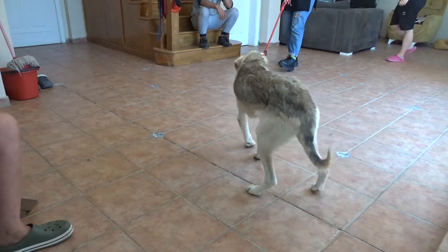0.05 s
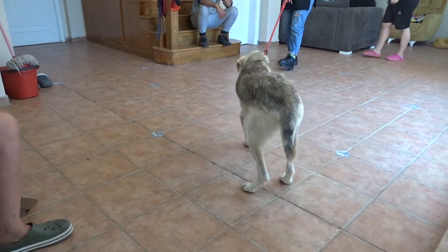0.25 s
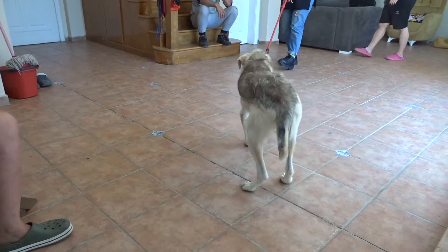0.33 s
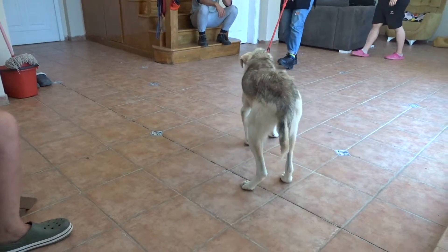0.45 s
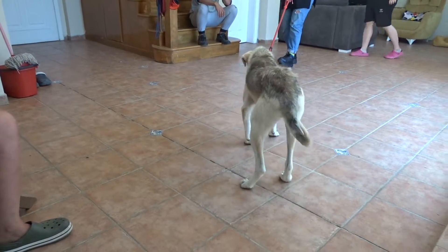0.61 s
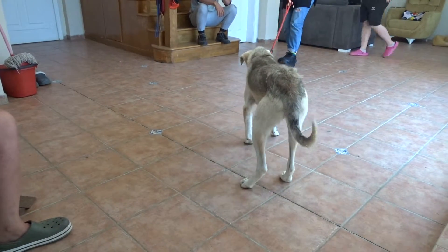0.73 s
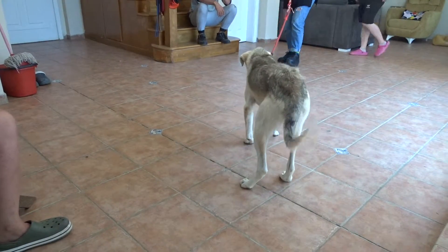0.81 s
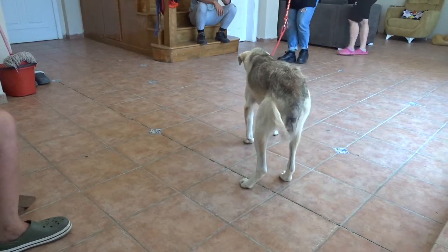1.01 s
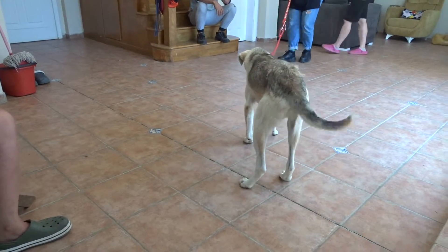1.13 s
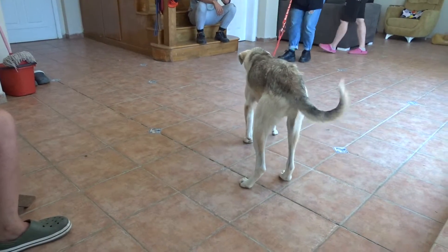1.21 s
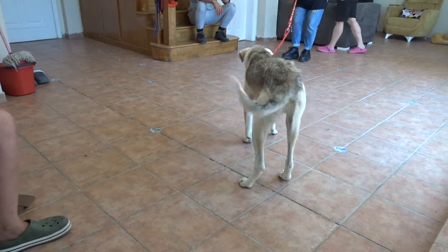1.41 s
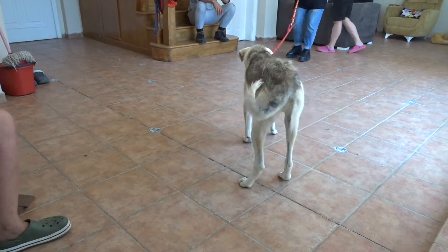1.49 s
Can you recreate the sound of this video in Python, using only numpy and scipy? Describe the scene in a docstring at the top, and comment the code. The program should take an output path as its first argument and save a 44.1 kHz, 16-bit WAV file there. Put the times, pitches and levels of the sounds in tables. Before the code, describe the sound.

A dog whines once, a hoarse note joined by a thin, very high whistle that throbs and drops away. Paws and shoes scuff the tiles, then shifting feet rumble softly in the hard, echoing room.

```python
"""A hard, tiled room, heard through a closely spaced pair of microphones. A dog whines: its vocal folds
give a hoarse low note that swells and fades, with a soft whimper under it. Air hissing through its nose
drives a thin, very high whistle that slides up, holds and drops away, throbbing as it splits into two
strands and ringing off the tiles. Paws and shoes scuff the floor, and shifting feet rumble at the end."""
import sys
import numpy as np
from scipy import signal
from scipy.fft import rfft, irfft
from scipy.io import wavfile

SR = 44100
rng = np.random.default_rng(int(sys.argv[2]) if len(sys.argv) > 2 else 0)


def master(y):
    """Save y as 16-bit WAV."""
    cut = np.clip(np.atleast_2d(y).T, -1, 1)
    pcm = np.round(cut * 32767)  # scale
    wavfile.write(sys.argv[1], SR, pcm.astype(np.int16))


N = 68355
T = np.arange(N) / SR
HZ = np.fft.rfftfreq(N, 1 / SR)
BAND_LIMIT_HZ = 11150


def amp(db):
    """Decibels to gain."""
    return 10 ** (np.asarray(db) / 20)


def unit(x):
    """Scales to an rms of one."""
    return x / np.sqrt(np.mean(x ** 2) + 1e-20)


def read(points, hz):
    """Reads a spectrum on a log-frequency axis."""
    f, value = np.transpose(points)
    return np.interp(np.log(hz + 1), np.log(f + 1), value)


def curve(rows):
    """Every value column of a time table, sample by sample."""
    time_s, *columns = np.transpose(rows)
    return [np.interp(T, time_s, column) for column in columns]


def gate(rows):
    """Open from the first row to the last, with 4 ms edges."""
    return np.clip(np.minimum(T - rows[0][0], rows[-1][0] - T) / .004, 0, 1)


def wander(rate_hz):
    """Random drift, mostly slower than the given rate."""
    return unit(irfft(rfft(rng.standard_normal(N)) / (1 + (HZ / rate_hz) ** 4), N))


def mic_pair(spectra):
    """Makes two unrelated spectra as alike as two closely spaced microphones hear them."""
    # likeness of left and right: frequency_hz, correlation
    likeness = [(100, 1), (700, 0.93), (1400, 0.92), (3000, 0.7), (5000, 0.86), (8000, 0.85), (11000, 0.39)]
    same = np.clip(read(likeness, HZ), -1, 1)
    return np.array([spectra[0], same * spectra[0] + np.sqrt(1 - same ** 2) * spectra[1]])


def noise(colour, resonances=()):
    """Diffuse two-channel noise of a given colour, with narrow resonances."""
    peaks_db = sum(boost / (1 + (2 * (HZ - hz) / width) ** 2) for hz, width, boost in resonances)
    white = mic_pair(rfft(rng.standard_normal((2, N))))
    return unit(irfft(white * amp(read(colour, HZ) + peaks_db), N))


def room(x, wet_db, gap_s=.004, early_db=3, early_s=0.018):
    """Direct sound plus dense reflections from tiles and walls, strongest at first."""
    # time the room takes to die away by 60 dB: frequency_hz, decay_s
    reverb_time = [(150, 0.33), (700, 0.91), (1400, 0.82), (5000, 0.6), (8000, 0.73), (11000, 0.22)]
    echoes = rng.standard_normal((2, N)) * (rng.random(N) < 3000 / SR)  # about 3000 a second
    hz, t, bands = signal.stft(irfft(mic_pair(rfft(echoes)), N), SR, nperseg=256)
    decay = amp(-60 * t / read(reverb_time, hz)[:, None])
    tail = signal.istft(bands * decay, SR, nperseg=256)[1][:, :N]
    tail = tail * (T > gap_s) * amp(early_db * np.exp(-T / early_s))
    tail /= np.sqrt(np.mean(abs(rfft(tail)[:, HZ < BAND_LIMIT_HZ]) ** 2))
    wet = signal.fftconvolve(x[None], tail, axes=1)[:, :N]
    return (x + amp(wet_db) * wet) / np.sqrt(1 + amp(wet_db) ** 2)


def room_tone(hum_hz=291.8):
    """The still room, microphone hiss and a faint wavering hum."""
    # colour of the still room: frequency_hz, gain_db
    room_colour = [(20, -15), (45, -21), (70, -13), (150, -5), (290, 2), (400, -2), (750, -8.5),
                   (1100, -17.5), (2500, -14.5), (5000, -12), (8000, -8), (11000, -15)]
    # colour of each microphone's own hiss: frequency_hz, gain_db
    hiss_colour = [(20, -19), (70, -11), (160, -3), (300, -0.5), (700, 0), (1400, 0.5), (3000, -10.5),
                   (5000, -15), (10000, -26)]
    hum = np.sin(2 * np.pi * hum_hz * T + 0.63 * wander(4.9)) * amp(-65.5 + 2.25 * wander(13))
    hiss = unit(irfft(rfft(rng.standard_normal((2, N))) * amp(read(hiss_colour, HZ)), N))
    return amp(-55) * noise(room_colour) + amp(-58) * hiss + np.sqrt(2) * hum


def feet():
    """Feet shift across the floor: a low boom with a soft shuffle on top."""
    # the feet's movement: time_s, rumble_db, shuffle_db
    movement = [(.95, -94, -65), (1.04, -66, -54.5), (1.10, -63, -59.5), (1.17, -68, -47),
                (1.25, -52.5, -54.5), (1.34, -50.5, -56.5), (1.42, -60, -63), (1.55, -64, -57)]
    # colour of the boom: frequency_hz, gain_db
    rumble_colour = [(50, -42.5), (100, -17), (125, 2.5), (145, 12.5), (180, -12), (250, -17), (295, 2.5),
                     (350, -13), (900, -43)]
    # colour of the shuffle: frequency_hz, gain_db
    shuffle_colour = [(60, -11), (200, -2), (400, -14.5), (780, -8.5), (1050, -25), (1400, -14.5),
                      (2500, -23.5), (3500, -15), (6000, -21.5)]
    rumble_db, shuffle_db = curve(movement)
    rumble = amp(rumble_db) * noise(rumble_colour)
    shuffle = amp(shuffle_db) * noise(shuffle_colour)
    return (T > movement[0][0]) * (rumble + shuffle)


def scuffs():
    """Short gritty slides of paws and soles on the tiles."""
    # one slide a row: start_s, level_db, rise_s, decay_s
    slides = [(-.02, -47, 0.017, 0.078), (0.119, -42, 0.0026, 0.071), (0.138, -43, 0.0052, 0.03),
              (0.255, -40, 0.00092, 0.048), (0.462, -38.5, 0.0093, 0.065), (0.966, -48, 0.048, 0.03),
              (1.119, -50, 0.039, 0.042), (1.35, -54, 0.023, 0.065)]
    # colour of the friction: frequency_hz, gain_db
    friction_colour = [(50, -42), (200, -30), (600, 11.5), (1500, 4), (3000, -1), (4500, 1), (6000, 4),
                       (8000, 9), (11000, 2.5)]
    level = np.zeros(N)
    for start_s, level_db, rise_s, decay_s in slides:
        rise = np.clip((T - start_s) / rise_s, 0, 1)
        decay = np.exp(-np.maximum(T - start_s - rise_s, 0) / decay_s)
        level += amp(level_db) * rise * decay
    friction = noise(friction_colour)[0]
    grit = amp(0.91 * wander(350))
    return room(level * friction * grit, wet_db=-6.5)


def nose_air():
    """The hiss of the air that drives the whistle, coloured by the nose."""
    # strength of the breath: time_s, level_db
    breath = [(.24, -59), (.28, -44.5), (.40, -40.5), (.52, -39.5), (.68, -42.5), (.84, -45), (.94, -43.5),
              (1.0, -41), (1.02, -45)]
    # colour of the breath: frequency_hz, gain_db
    colour = [(150, -20), (1000, -10.5), (2400, -9), (3100, -14.5), (4000, -2), (4500, -13), (5600, 5),
              (6400, -4), (7400, 1.5), (8200, -2.5), (9000, 0.5), (11000, -6)]
    # resonances of the nose: centre_hz, width_hz, boost_db
    nose = [(5700, 61, 0), (6936, 260, 11), (7850, 350, 7)]
    level = amp(curve(breath)[0]) * gate(breath)
    diffuse = level * noise(colour, nose)
    echoing = room(level * noise(colour, nose)[0], wet_db=-0.5)
    return amp(-3.5) * diffuse + amp(-6) * echoing


def whimper():
    """A soft, rising, closed-mouth note."""
    # course of the note: time_s, pitch_hz, level_db
    note = [(.45, 410, -64), (.50, 414.8, -54), (.59, 444.6, -44), (.65, 451.3, -62), (.69, 452.7, -52.5),
            (.76, 451, -53), (.81, 445, -75)]
    pitch_hz, level_db = curve(note)
    phase = 2 * np.pi * np.cumsum(pitch_hz * (1 + 0.013 * wander(65))) / SR
    return room(np.sqrt(2) * amp(level_db) * gate(note) * np.sin(phase), wet_db=-0.5)


def whine(jitter=.034):
    """Unsteady vocal folds and hoarse air; the voice thins as the effort falls."""
    # course of the voice: time_s, pitch_hz, effort_db
    voice = [(.04, 737.6, -51), (.088, 746.2, -37), (.11, 687.4, -35.5), (.17, 678, -35), (.24, 676, -32),
             (.30, 681.6, -36), (.38, 683.6, -35), (.46, 666.2, -37.5), (.56, 666.6, -40.5),
             (.625, 675, -53), (.69, 682.7, -41), (.73, 679, -56), (.88, 690, -47.5), (.92, 681, -57)]
    # harmonics of the folds: multiple, gain_at_full_effort_db, growth_db_per_db
    harmonics = [(1, -11, 1.1), (2, -1, 0.5), (3, -17, 0.7), (4, -28.5, 0.7)]
    # colour of the hoarse air: frequency_hz, gain_db
    rasp_colour = [(60, -55), (250, -18), (500, -17), (700, 4), (950, -13), (1350, -1), (1750, -9.5),
                   (2600, -9), (3100, -19.5), (5000, -43)]
    # resonances of the throat: centre_hz, width_hz, boost_db
    throat = [(1268, 50, 11.5), (1460, 18, -1), (1864, 25, 4), (2200, 35, 3), (2346, 110, 6), (2568, 74, 9)]
    pitch_hz, effort_db = curve(voice)
    from_peak_db = effort_db - effort_db.max()
    phase = 2 * np.pi * np.cumsum(pitch_hz * (1 + jitter * wander(130))) / SR
    folds = sum(amp(db + growth * from_peak_db) * np.sin(k * phase) for k, db, growth in harmonics)
    rasp = amp(-7.5 + 0.24 * from_peak_db) * noise(rasp_colour, throat)[0]
    return room(amp(effort_db) * gate(voice) * (np.sqrt(2) * folds + rasp), wet_db=2.5)


def whistle(jitter=.0008, split_s=.42, beat_hz=31.06):
    """A nearly pure nasal whistle with a faint octave; it splits into two strands that beat."""
    # slide of the whistle: time_s, pitch_hz
    pitch = [(.212, 4740), (.24, 5163), (.26, 5274), (.30, 5234), (.33, 5214), (.36, 5198), (.385, 5110),
             (.415, 5098), (.44, 5020), (.468, 5133), (.50, 5115), (.55, 5078), (.585, 5110), (.62, 5042),
             (.68, 5069), (.72, 5065), (.79, 5097), (.85, 5095), (.91, 5118), (.975, 5103), (.993, 5012),
             (1.012, 4480)]
    # strength of the whistle: time_s, level_db
    strength = [(.216, -51), (.232, -32), (.26, -24.5), (.32, -21), (.365, -15.5), (.41, -23), (.48, -18.5),
                (.57, -24.5), (.68, -23.5), (.76, -25.5), (.88, -26.5), (.975, -21.5), (.996, -24.5),
                (1.014, -53)]
    # strength of its octave: time_s, level_db
    octave_strength = [(.21, -52), (.226, -38), (.25, -45), (.29, -46), (.39, -40), (.66, -39.5),
                       (.78, -46), (.95, -50), (1.006, -37.5), (1.025, -62)]
    pitch_hz = curve(pitch)[0] * (1 + jitter * wander(60))
    phase = 2 * np.pi * np.cumsum(pitch_hz) / SR
    split = np.clip((T - split_s) / 0.027, 0, 1)
    # the strands lie half the beat rate above and below the pitch
    apart = np.pi * np.cumsum(split * beat_hz * (1 + 0.24 * wander(9.3))) / SR
    lower_gain = split * amp(-1)
    strands = (np.sin(phase + apart) + lower_gain * np.sin(phase - apart)) / np.sqrt(1 + lower_gain ** 2)
    tone = amp(curve(strength)[0]) * gate(strength) * strands
    octave = amp(curve(octave_strength)[0]) * gate(octave_strength) * np.sin(2 * phase)
    lean_right = amp([[-1.75], [1.75]])
    return np.sqrt(2) * (room(tone, wet_db=1) + lean_right * room(octave, wet_db=8))


def scene():
    """The dog, the feet and the room together."""
    return whistle() + whine() + whimper() + nose_air() + scuffs() + feet() + room_tone()


def record(dry):
    """The two microphones differ a little in colour, and the top of the treble is cut off."""
    # balance of the pair: frequency_hz, left_minus_right_db
    balance = [(100, .6), (1400, 1.1), (2800, 0.3), (5100, -1.2), (7500, 0), (10200, -1)]
    tilted = irfft(rfft(dry) * amp(np.array([[.5], [-.5]]) * read(balance, HZ)), N)
    low_pass = signal.firwin(511, BAND_LIMIT_HZ, window=("kaiser", 9), fs=SR)
    return signal.oaconvolve(tilted, low_pass[None], "same")


dry = scene()
out = record(dry)
master(out)
```